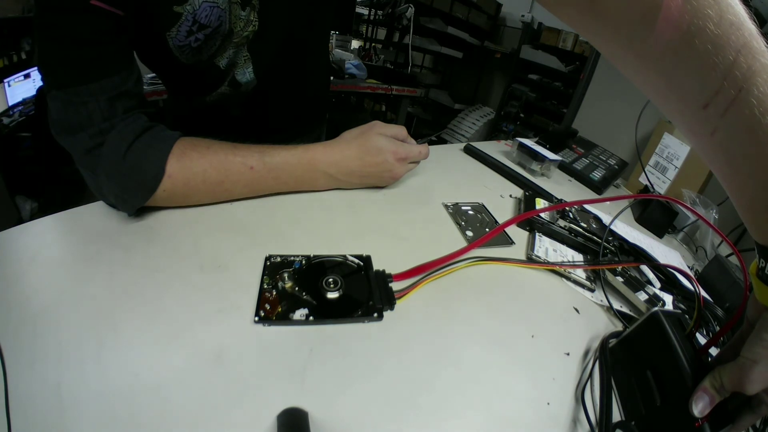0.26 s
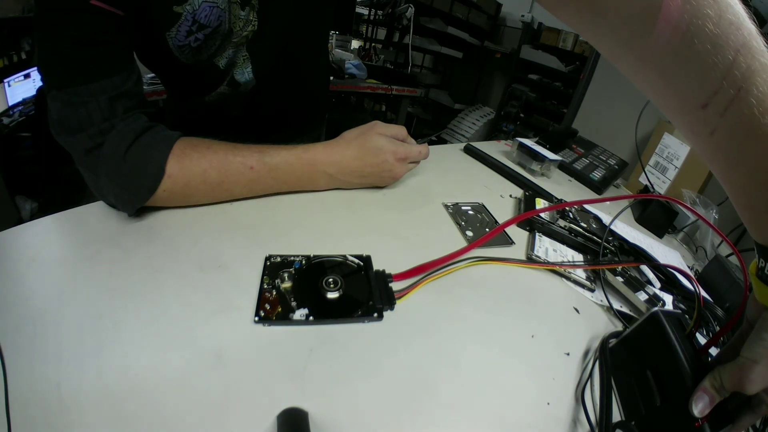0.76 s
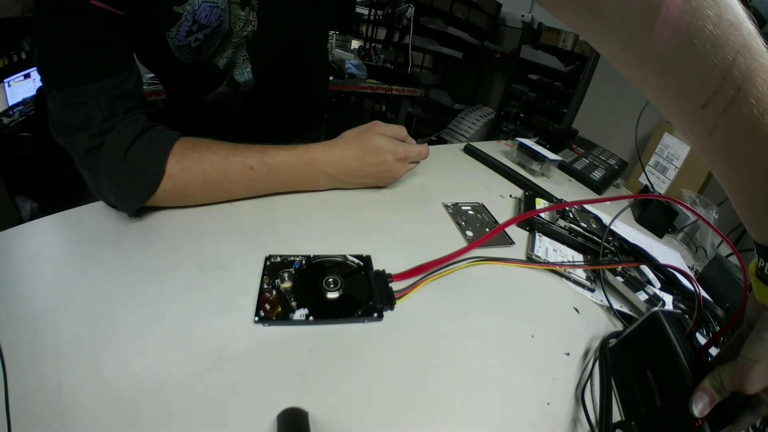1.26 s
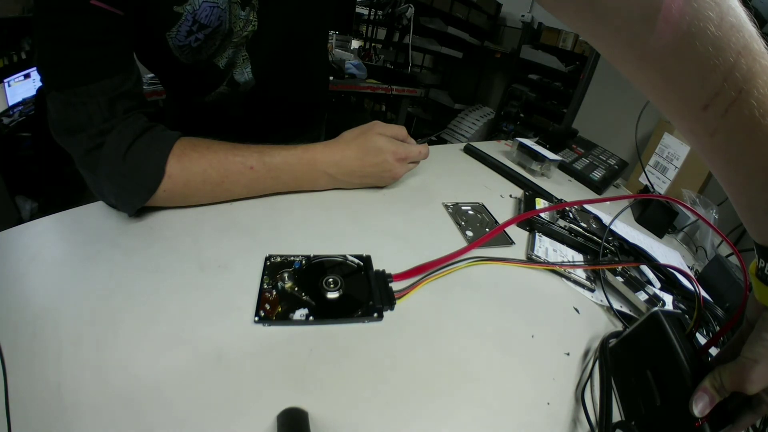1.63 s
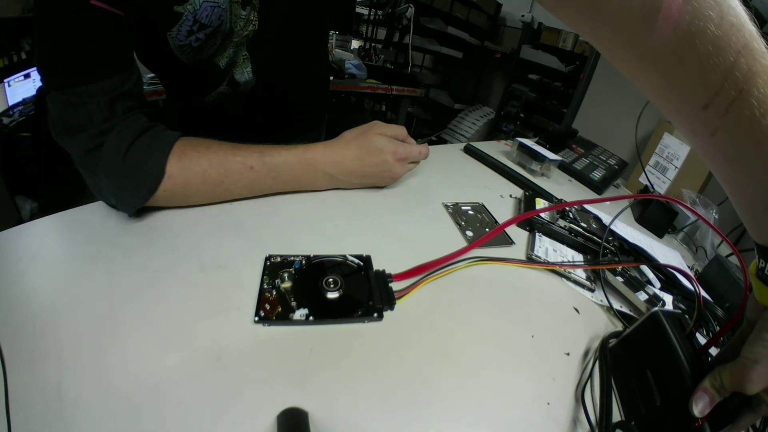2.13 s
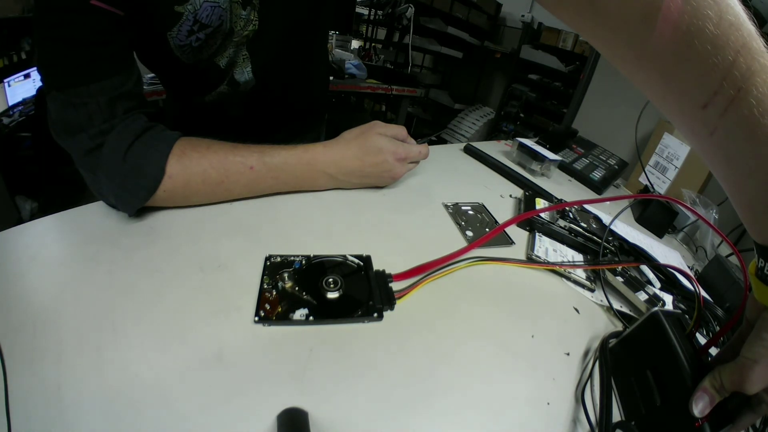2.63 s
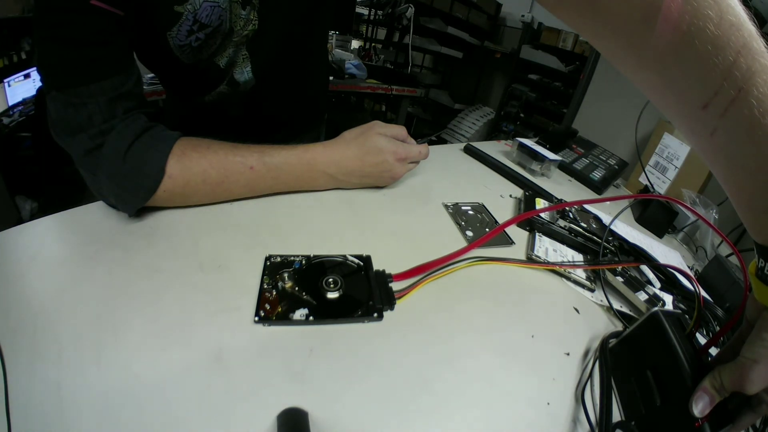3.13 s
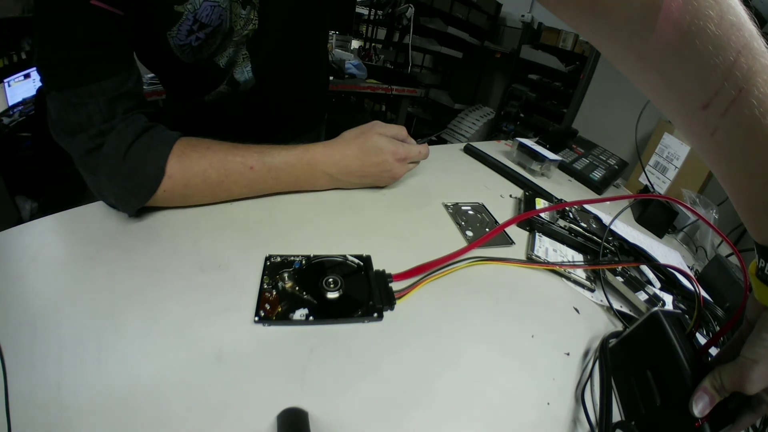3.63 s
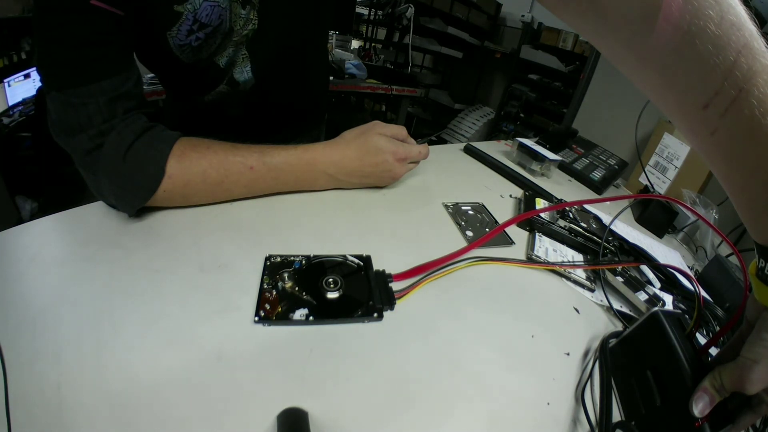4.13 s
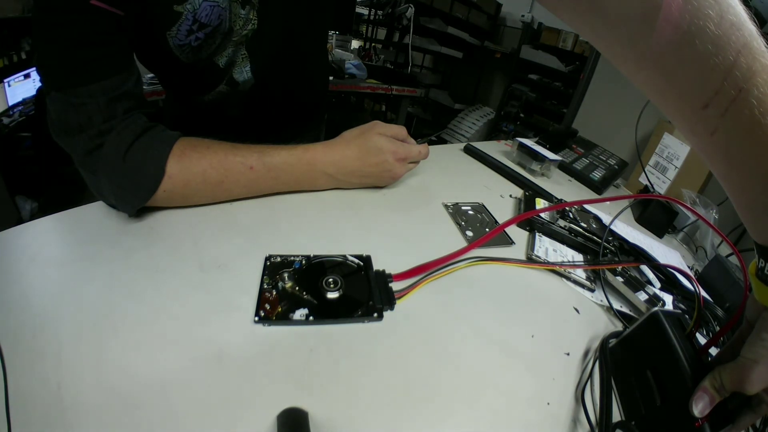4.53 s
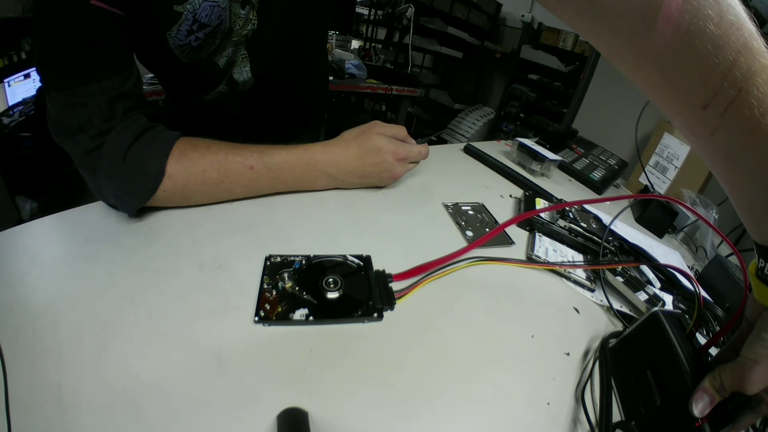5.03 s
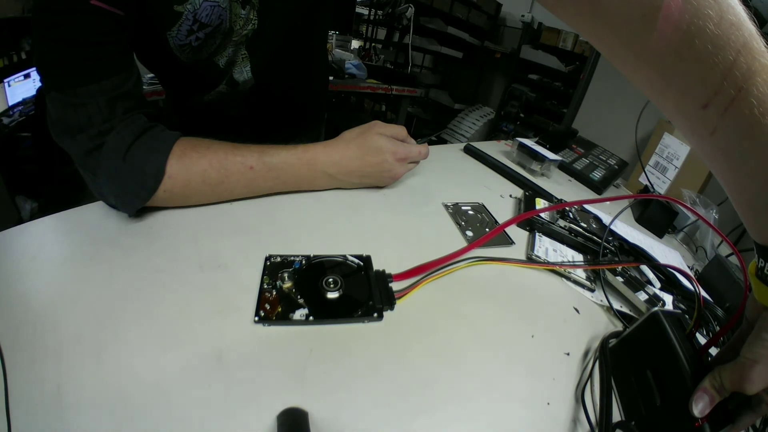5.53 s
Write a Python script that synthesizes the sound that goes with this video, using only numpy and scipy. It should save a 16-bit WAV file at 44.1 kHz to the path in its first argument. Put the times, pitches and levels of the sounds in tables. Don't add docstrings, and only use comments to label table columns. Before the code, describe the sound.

A failing hard drive chatters, whistles faintly and clacks hard in irregular bursts on a bench, over a low steady fan hum with a thin whine.

```python
import sys
import numpy as np
from scipy import signal
from scipy.fft import rfft, irfft, next_fast_len
from scipy.io import wavfile
from scipy.ndimage import uniform_filter1d

SR = 44100
rng = np.random.default_rng(int(sys.argv[2]) if len(sys.argv) > 2 else 0)


def makeup_ratio(level_db):
    decades = np.asarray(level_db, float) / 20
    return 10 ** decades


def digitize_waveform(pressure):
    field = np.atleast_2d(pressure).T
    bounded = np.clip(field, -1, 1)
    quanta = np.round(bounded * 32767).astype(np.int16)
    wavfile.write(sys.argv[1], SR, quanta)


N = 254456
SIZE = next_fast_len(N + SR)
HZ = np.arange(SIZE // 2 + 1) * SR / SIZE
TURN_S = 0.01124


def rms_one(x):
    return x / np.sqrt(np.mean(x ** 2) + 1e-20)


def at_hz(points):
    hz, value = np.transpose(points)
    return np.interp(np.log(HZ + 1), np.log(hz), value)


def filtered(x, response):
    return irfft(rfft(x, SIZE) * response, SIZE)[..., :N]


def shaped(spectrum):
    return rms_one(irfft(spectrum, SIZE)[:, :N])


def resonance(hz, width_hz):
    return 1j * HZ * width_hz / (hz ** 2 - HZ ** 2 + 1j * HZ * width_hz)


def ears(pan_db, lag_rad):
    return np.array([[makeup_ratio(pan_db / 2)], [makeup_ratio(-pan_db / 2) * np.exp(-1j * lag_rad)]])


# mode_hz, left_right_db, right_lag_rad
MIC_PAIR = [(1300, -1, 0), (2100, 2.5, .3), (2500, 2, .7), (3050, 3, -.5), (3900, 0, .55),
            (4750, -3.5, 1.2), (6700, 1.5, 1.1), (8150, 2.5, 1.9), (9100, 1, .6), (10100, 3, 2.5),
            (11000, -2, 2.1), (12500, 3, 3.1), (14400, 5, 3.6)]


def body(modes):
    at_mode_hz, pan_db, lag_rad = np.transpose(MIC_PAIR)
    total = 0
    for k, (hz, width_hz, db) in enumerate(modes):
        sides = ears(np.interp(hz, at_mode_hz, pan_db), np.interp(hz, at_mode_hz, lag_rad))
        total = total + (-1) ** k * makeup_ratio(db) * sides * resonance(hz, width_hz)
    return total


# freq_hz, likeness
LIKENESS = [(60, 1.0), (150, 1), (380, 0.95), (950, 0.69), (2380, -0.004), (5980, -0.31), (15000, 0.094)]


def stereo_noise():
    alike = np.clip(at_hz(LIKENESS), -1, 0.996)
    mid, side = rfft(rng.standard_normal((2, SIZE)))
    return np.sqrt(1 + alike) * mid + np.sqrt(1 - alike) * side * [[1], [-1]]


def contacts(times_s, peak_db, length_s, modes, edge_s, drag_db):
    t = np.arange(4096) / SR
    after = np.maximum(t - np.reshape(length_s, (-1, 1)), 0)
    onset = 1 - np.exp(-(t / edge_s) ** 2)
    decay = np.exp(-after / edge_s) + makeup_ratio(drag_db) * np.exp(-after / 0.0043)
    shape = onset * decay * (t < 0.04)
    apart = 0.51 * rng.standard_normal((len(times_s), 2, len(t)))
    spray = shape[:, None] * (rng.standard_normal((len(times_s), 1, len(t))) + apart)
    ring = irfft(body(modes), SIZE)[:, :len(t) // 2]
    rung = irfft(rfft(spray) * rfft(ring, len(t)), len(t))
    loudest_2ms = uniform_filter1d(np.mean(rung ** 2, axis=1), size=80).max(axis=1) ** 0.5
    rung = rung * (makeup_ratio(peak_db) / loudest_2ms)[:, None, None]
    out = np.zeros((2, N + len(t)))
    for s, sound in zip(times_s, rung):
        first = round(s * SR)
        out[:, first:first + len(t)] += sound
    return out[:, :N]


# freq_hz, density_db_per_hz
ROOM_AIR = [(12, -45), (20, 3), (86, -9.5), (116, -0.5), (142, -11.5), (293, -15.5), (527, -30.5),
            (574, -28), (1260, -29.5), (1370, -23.5), (1480, -30), (1660, -24.5), (1860, -29),
            (4540, -36.5), (16000, -53.5)]
# freq_hz, width_hz, rms_db
HUM = [(38, 35, -49.5), (115.3, 12.7, -50.5), (205.7, 29, -65), (285.6, 38, -62), (512, 52, -66.5)]
# freq_hz, rms_db, wander_hz, left_right_db
FAN_LINES = [(410.4, -71.5, 1.62, 10.5), (1348, -60, 1.29, -4), (1634, -57, 0.86, -4.5),
             (2024, -67.5, 2.52, -2), (2447, -73.5, 3.2, -17)]


def fans():
    out = makeup_ratio(-43.5) * shaped(stereo_noise() * makeup_ratio(at_hz(ROOM_AIR)))
    air = stereo_noise()
    for hz, width_hz, db in HUM:
        out += makeup_ratio(db) * shaped(air * resonance(hz, width_hz) ** 2)
    for hz, db, wander_hz, pan_db in FAN_LINES:
        slow = np.exp(-(HZ / 2.78) ** 2)
        speed, level = rms_one(filtered(rng.standard_normal((2, N)), slow))
        phase = 2 * np.pi * np.cumsum(hz + wander_hz * speed) / SR
        tone = np.real(ears(pan_db, -hz / 1900) * np.exp(1j * phase))
        out += np.sqrt(2) * makeup_ratio(db + 0.5 * level) * tone
    return out


# time_s, hiss_db
FLIGHT = [
    [(.145, -79), (.43, -74), (.59, -77)],
    [(1.51, -82), (1.6, -82), (1.725, -80)],
    [(2.38, -78), (2.61, -75.5), (2.85, -76), (3.6, -75.5), (4.25, -78.5), (4.4, -84)],
    [(4.4, -82), (4.6, -72), (5.3, -81.5), (5.45, -78.5), (5.69, -77)],
]
# freq_hz, density_db_per_hz
HISS = [(3000, 5), (4000, -14), (5200, -5.5), (10000, -5), (13000, -26)]
# freq_hz, width_hz, level_db
TOP_HISS = [(10600, 1500, -3), (12700, 1100, -2), (14400, 300, 4), (15600, 350, 0)]
# landing_s, whistle_lead_ms, chatter_half_turns, peak_db
RETRIES = [(0.2218, 36, 6, -39.5), (0.312, 46, 1, -41), (0.3683, 21, 5, -37.5), (0.442, 36, 3, -34.5),
           (0.5029, 26, 3, -40.5), (0.5713, 38, 2, -34), (2.4785, 37, 3, -39), (2.5807, 43, 3, -37.5),
           (2.6572, 37, 4, -38.5), (2.7287, 31, 1, -37), (2.901, 30, 2, -41), (3.075, 42, 1, -45),
           (3.187, 33, 1, -45), (3.261, 38, 2, -42), (3.444, 22, 3, -48), (3.5404, 42, 1, -26.5),
           (3.7644, 32, 1, -39.5), (3.837, 46, 2, -29), (4.0412, 26, 2, -41), (4.1257, 52, 2, -24),
           (4.1868, 26, 1, -42.5), (4.2468, 37, 2, -36.5), (4.5, 31, 1, -42), (4.6743, 32, 2, -43),
           (4.9014, 30, 1, -40), (4.959, 44, 1, -32.5), (5.12, 34, 1, -45), (5.396, 31, 1, -45),
           (5.452, 34, 1, -59), (5.648, 32, 6, -41)]
# start_s, end_s, level_db
FAILED_LOAD = (1.6, 1.73, -62)
WHISTLE_HZ, WHISTLE_WIDTH_HZ, WHISTLE_DB, WHISTLE_OVERLAP_S = 11800, 380, -54, 0.0042
FAINT_WHISTLE_DB, WHISTLE_FADES = -68.5, 0.6
RUB_DB = 11


def flight():
    t, faint, top = np.arange(N) / SR, np.zeros(N), np.zeros(N)
    for rows in FLIGHT:
        s, top_db = np.transpose(rows)
        faint_db = FAINT_WHISTLE_DB - WHISTLE_FADES * (top_db + 70.5)
        on = (t >= s[0]) & (t <= s[-1])
        faint[on] = makeup_ratio(np.interp(t[on], s, faint_db))
        top[on] = makeup_ratio(np.interp(t[on], s, top_db))

    bursts = np.zeros(N)
    for s, lead_ms, _, _ in RETRIES:
        bursts += makeup_ratio(WHISTLE_DB) * (t > s - lead_ms / 1000) * (t < s + WHISTLE_OVERLAP_S)
    bursts *= faint > 0
    start_s, end_s, load_db = FAILED_LOAD
    bursts += makeup_ratio(load_db) * (t > start_s) * (t < end_s)

    band = np.exp(-((HZ - WHISTLE_HZ) / (WHISTLE_WIDTH_HZ / 2)) ** 2)
    whistle = rms_one(filtered(rng.standard_normal(N), band * ears(-7.4, 3.6)))
    whistle /= uniform_filter1d(np.mean(whistle ** 2, axis=0), size=4000) ** 0.5
    whistle *= faint + uniform_filter1d(bursts, size=260)

    hiss = shaped(stereo_noise() * makeup_ratio(at_hz(HISS)))
    apart = 1.6 * rng.standard_normal((2, N))
    top_hiss = rms_one(filtered(rng.standard_normal(N) + apart, body(TOP_HISS)))
    once_a_turn = 1 + 0.36 * np.cos(2 * np.pi * t / TURN_S)
    rub_modes = body(ARM) + makeup_ratio(-6.5) * body(SLIDER)
    rub = rms_one(filtered(once_a_turn * rng.standard_normal(N), rub_modes))
    patchy = makeup_ratio(2.8 * rms_one(filtered(rng.standard_normal(N), np.exp(-(HZ / 7.5) ** 2))))
    return whistle + top * patchy * (makeup_ratio(14.5) * hiss + makeup_ratio(12) * top_hiss + makeup_ratio(RUB_DB) * rub)


# first_s, turns, first_peak_db, last_peak_db
RUNS = [(2.4158, 3, -37.5, -41), (2.502, 3, -37, -36), (2.7424, 2, -35, -41), (2.988, 3, -38, -35),
        (3.3227, 3, -45, -45), (3.5448, 4, -28, -27), (3.5901, 4, -21, -29), (3.6462, 3, -34, -32),
        (3.6808, 3, -24.5, -34), (3.8596, 2, -25.5, -25), (3.8819, 2, -25, -24), (3.9385, 3, -26.5, -25.5),
        (4.535, 2, -33, -35), (4.579, 5, -34, -35), (4.7243, 2, -28.5, -25), (4.7469, 6, -26, -25.5),
        (4.9812, 2, -27, -28), (5.0506, 2, -43, -46)]
# time_s, peak_db
GRAZES = [(1.719, -41), (1.7256, -41), (2.4696, -40), (2.652, -38), (2.788, -46), (2.821, -46),
          (2.9174, -26.5), (2.966, -48), (3.088, -29), (3.103, -27.5), (3.1171, -45), (3.194, -27.5),
          (3.29, -30), (3.3066, -45), (3.362, -27.5), (3.3708, -43), (3.375, -46), (3.4677, -34.5),
          (3.572, -26), (3.604, -42), (3.676, -28), (3.7143, -26.5), (3.9154, -27.5), (4.2698, -28),
          (4.597, -38), (4.6073, -40), (4.691, -36), (4.8253, -36), (4.8476, -36.5), (5.0258, -26.5)]
HALF_TURN_LOSS_DB = 4


def graze_times():
    grazes = [(s, db, 0) for s, db in GRAZES]   # time_s, peak_db, loose
    for s, _, halves, db in RETRIES:
        for k in range(round(halves)):
            grazes.append((s + k * TURN_S / 2, db - HALF_TURN_LOSS_DB * (k % 2), k > 0))
    for s, turns, first_db, last_db in RUNS:
        for k in range(round(turns)):
            db = first_db + (last_db - first_db) * k / (round(turns) - 1)
            grazes.append((s + k * TURN_S, db, 0))
    s, db, loose = np.transpose(grazes)
    chance = rng.standard_normal((len(s), 2))
    return s + 0.0012 * loose * chance[:, 0], db + 2.4 * loose * chance[:, 1]


# freq_hz, width_hz, level_db
ARM = [(2100, 25, -5.5), (3644, 32, 5.5), (3810, 124, 8.5), (4058, 237, 11), (4140, 300, -3),
       (4580, 80, -10), (4815, 72, 4.5), (5300, 260, -11.5), (5600, 110, -4)]
SLIDER = [(6813, 350, 7), (7850, 200, 4), (8040, 350, 10), (8140, 52, 10), (9300, 120, -22)]
SUSPENSION = [(9300, 290, -1), (9790, 180, 17), (10920, 290, 24.5), (11300, 300, -21), (12400, 640, -35),
              (14400, 250, -19), (15600, 270, -38)]
GRAZE_MS, SHORTER_PER_DB, LENGTH_SPREAD_DB = 2.56, 0.51, 5
SUSPENSION_LOSS_DB, SUSPENSION_TOP_DB = 4.5, -42.5


def ticks():
    s, db = graze_times()
    chance = rng.standard_normal((len(s), 2))
    length_db = -SHORTER_PER_DB * (db + 33.5) + LENGTH_SPREAD_DB * chance[:, 0]
    length_s = GRAZE_MS / 1000 * makeup_ratio(length_db)
    slider_db = db - 11.5 + 2.0 * rng.standard_normal(len(s))
    high_db = np.minimum(db - SUSPENSION_LOSS_DB, SUSPENSION_TOP_DB) + 0.83 * chance[:, 1]
    arm = contacts(s, db - 6.5, length_s, ARM, edge_s=0.0002, drag_db=-14)
    slider = contacts(s, slider_db, length_s, SLIDER, edge_s=0.0004, drag_db=-6)
    suspension = contacts(s, high_db - 2.5, length_s, SUSPENSION, edge_s=0.00027, drag_db=-5)
    return arm + slider + suspension


# time_s, peak_db, bounce_after_ms, bounce_peak_db
BLOWS = [
    (0.5942, -14, 9.4, -46),
    (.614, -10.5, 10.5, -25),
    (1.7397, -26, 4.9, -49),
    (2.0913, -12, 8.8, -19),
    (3.388, -7.5, 5.2, -27),
    (3.406, -14.5, 12, -41),
    (5.6891, -15, 8.5, -49),
    (5.7087, -12, 10.2, -27.5),
]
# time_s, peak_db
TOUCHES = [
    (.59, -32),
    (1.7523, -44),
    (3.4036, -36),
    (5.6843, -28),
]
# freq_hz, width_hz, level_db
THUD = [(465, 240, -12.5), (733, 340, -7.5), (918, 65, 3.5), (1290, 66, 7.5), (1600, 1600, -20.5)]
CASTING = [(1998, 34.4, 3), (2355, 130, -2.5), (2594, 130, -1), (2800, 130, -5), (3215, 320, -1),
           (3830, 430, -33), (3805, 184, 5.5), (4035, 376, 2.5), (4545, 84, 2), (5200, 170, -0.5),
           (5710, 280, -2.5), (6350, 320, -8.5)]
CRACK = [(6850, 240, 2), (7570, 340, 5.5), (8200, 480, 5.5), (9100, 930, 5.5), (10560, 680, 13),
         (11200, 3500, -5), (13600, 1400, 1), (12100, 530, 10), (13300, 310, -33), (15200, 1200, -25)]
RATTLE_S, RATTLE_LOSS_DB = 0.025, 24
THUD_DB, THUD_FOLLOWS, BOUNCE_THUD_DB = -36, 0.23, 6.5
CRACK_DB, BOUNCE_CRACK_DB = -8.5, -4.5
SLAM_DB, SLAM_THUD_SHARE = -10.5, 2.04


def clacks():
    hits = [(s, db, 0) for s, db in TOUCHES]   # time_s, peak_db, bounce share
    for s, db, after_ms, bounce_db in BLOWS:
        share = SLAM_THUD_SHARE if db > SLAM_DB else 1
        hits.append((s, db, 0))
        hits.append((s + after_ms / 1000, bounce_db, share))
        hits.append((s + RATTLE_S, db - RATTLE_LOSS_DB, 0))
    s, db, bounce = np.transpose(hits)
    thud_db = np.minimum(THUD_DB + THUD_FOLLOWS * (db + 12.5), db - 9.5 + 12 * bounce)
    thud_db = thud_db + BOUNCE_THUD_DB * bounce
    crack_db = db + CRACK_DB + BOUNCE_CRACK_DB * (bounce > 0)
    casting = contacts(s, db - 3.5, 0.00025, CASTING, edge_s=0.00015, drag_db=-17)
    thud = contacts(s, thud_db - 2, 0.0039, THUD, edge_s=0.001, drag_db=-8)
    crack = contacts(s, crack_db, 0.0013, CRACK, edge_s=0.00018, drag_db=-0.5)
    return casting + thud + crack


# time_s, peak_db, ping_hz
SETTLES = [
    (1.2231, -46, 4560),
    (1.7405, -33.5, 2080),
    (1.776, -44, 2800),
    (3.4085, -24.5, 2320),
]


def settles():
    out = np.zeros((2, N))
    for s, db, hz in SETTLES:
        modes = [(hz, 160, 0), (11000, 7000, -23)]
        out += contacts([s], np.array([db]), 0.001, modes, edge_s=0.0004, drag_db=-25)
    return out


SHOP_T60_S, SHOP_DB = 0.15, -22


def workshop(x):
    t = np.arange(SR // 2) / SR
    dull, bright = rng.standard_normal((2, 2, len(t)))
    dull = signal.lfilter([0.35], [1, -0.65], dull) * makeup_ratio(-60 * t / SHOP_T60_S)
    bright = 0.72 * bright * makeup_ratio(-60 * t / (2.1 * SHOP_T60_S))
    tail = (dull + bright) * (t > 0.003)
    tail /= np.sqrt(np.sum(tail ** 2) / 2)
    return filtered(x.mean(axis=0), rfft(tail, SIZE)) * makeup_ratio(SHOP_DB)


def scene():
    drive = ticks() + clacks() + settles()
    return drive + workshop(drive) + flight() + fans()


def low_pass(x):
    return signal.sosfilt(signal.butter(12, 16660, fs=SR, output="sos"), x)


MIC_LOW_HZ, MIC_TOP_HZ = 33, 15800


def record(dry):
    low_loss = (MIC_LOW_HZ / (HZ + 1)) ** 8
    top_loss = (HZ / MIC_TOP_HZ) ** 300
    colour = 1 / np.sqrt((1 + low_loss) * (1 + top_loss))
    return low_pass(0.9 * np.tanh(filtered(dry, colour) / 0.9))


dry = scene()
out = record(dry)
digitize_waveform(out)
```